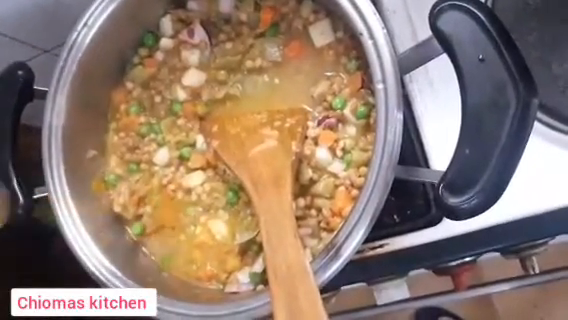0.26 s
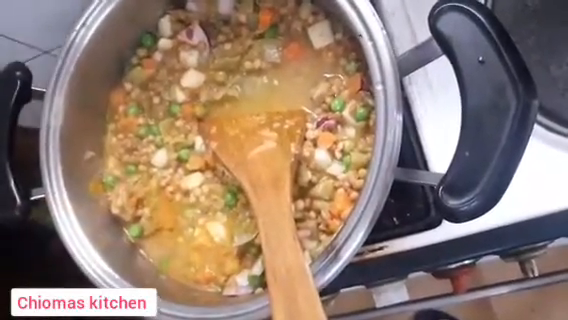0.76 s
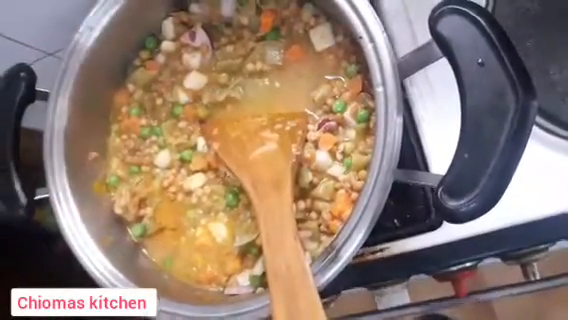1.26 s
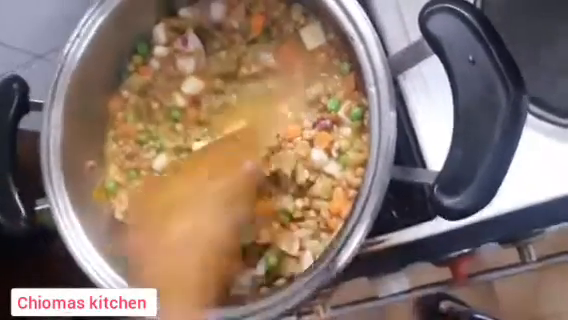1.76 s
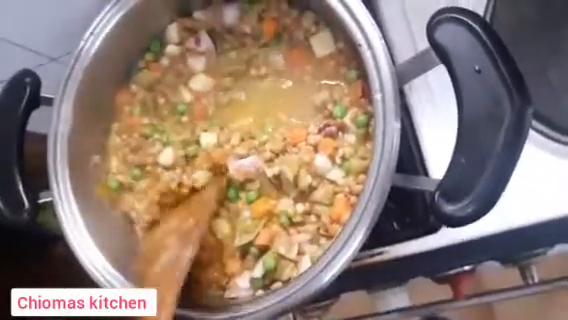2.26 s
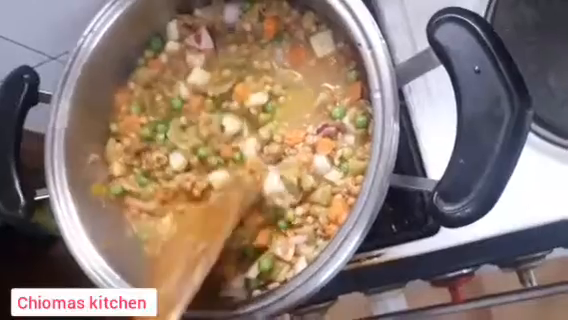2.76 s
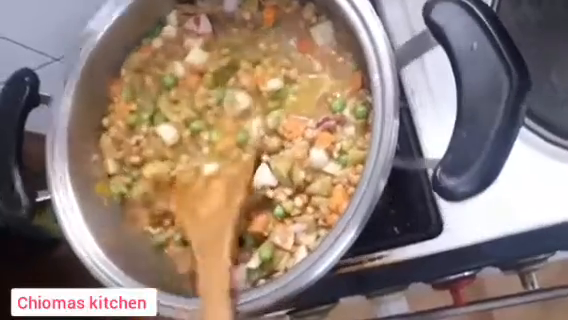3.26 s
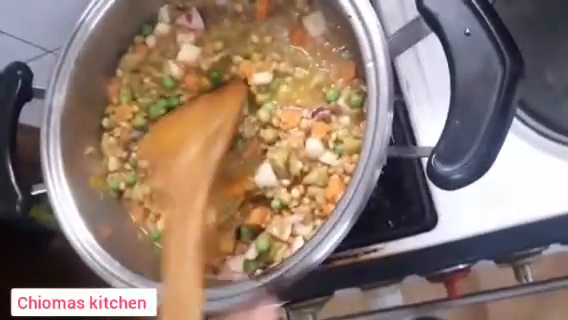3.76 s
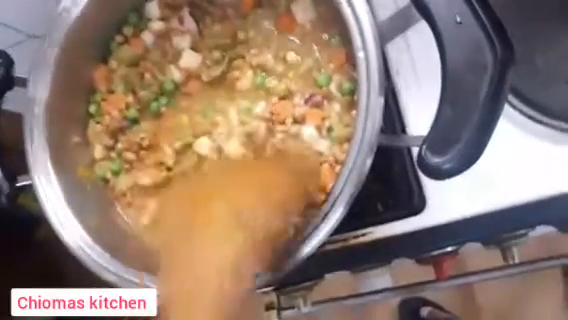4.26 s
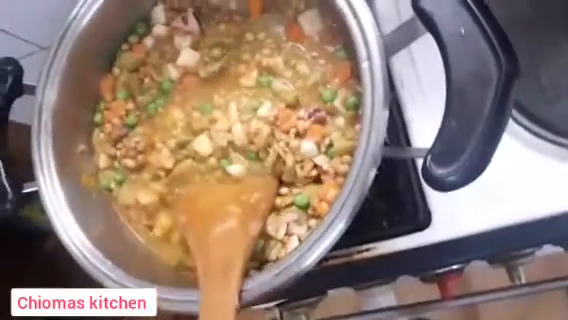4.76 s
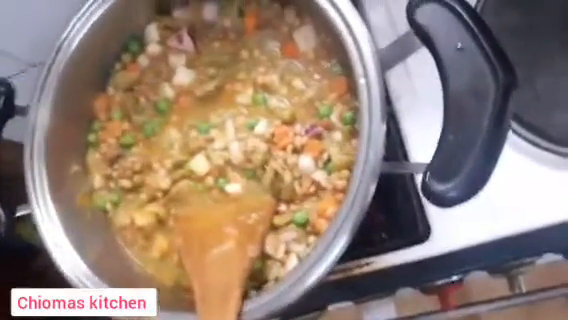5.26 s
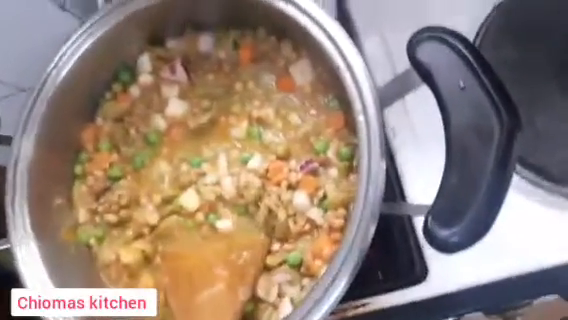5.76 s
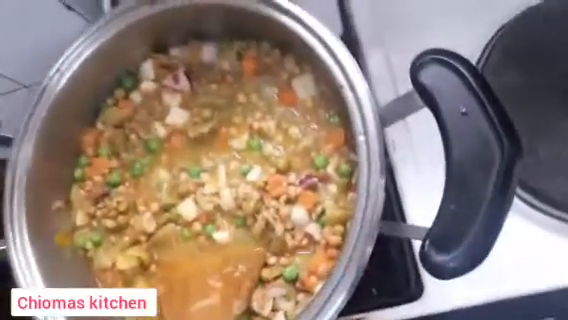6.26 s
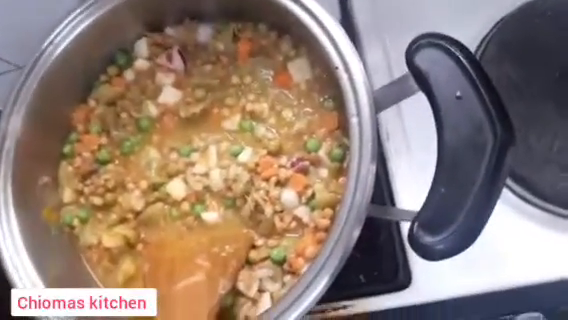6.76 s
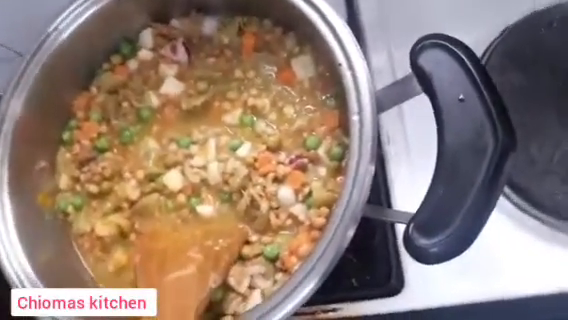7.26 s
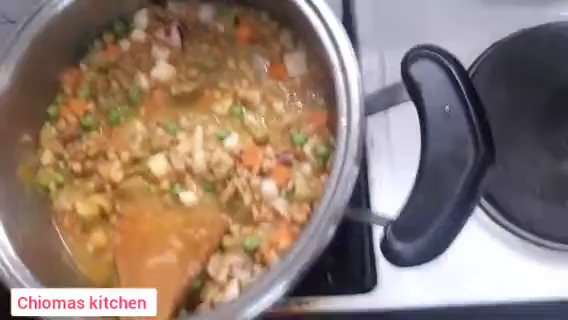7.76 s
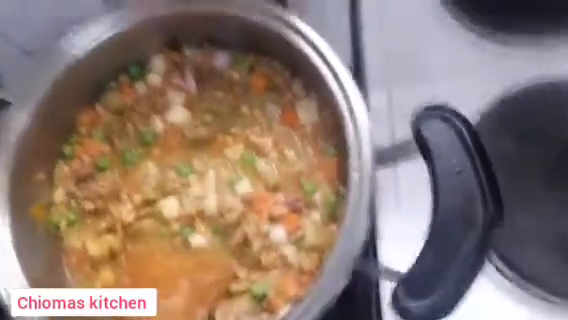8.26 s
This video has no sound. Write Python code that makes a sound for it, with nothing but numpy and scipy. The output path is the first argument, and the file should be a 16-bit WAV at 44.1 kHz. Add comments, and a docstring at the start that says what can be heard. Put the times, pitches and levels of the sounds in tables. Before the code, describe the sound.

A close mono phone microphone in a reflective home kitchen picks up low appliance drone, soft hiss and a faint high whine throughout. The first second is nearly just this bed with a weak rub. At 0.9 s a brief thin sagging tone and several taps sound until 1.4 s, with a bright wet swish and tiny ticks. At 2.1 s a loud sharp wooden spoon knock hits the damped steel pot, with softer bumps to 2.4 s. Knocks resume at 3.0 s, clustering around 3.2-3.4, 3.8-3.9, 4.1-4.6 and 4.7-5.0 s, mixed with scraping, wet slop and low stove thumps. Soft rubs follow. At 5.87 s a hard object drops loudly across the room, clattering for a third of a second with reverberation. A short squeaky rub comes at 6.55-6.7 s, then sparse taps to 7.4 s and gentle dragging. A lower whine grows towards 8.2 s; a firm double tap and scrape come at 8.3 s before the end at about 8.5 s.

```python
"""Close under a mono phone microphone, a wooden spoon works in a steel pot of thick porridge.
Appliance drone, hiss and a faint whine run throughout, under the rub and wet slop of stick-slip dragging.
A thin tone and taps on other things come first, with wet ticks; from 2.1 to 5 s the spoon knocks the pot,
sounding contact notes, a crack, a thud in the food, the damped pot and the stove. More taps follow; at 5.9 s
a hard object drops and clatters in the hard-walled kitchen, then comes a squeaky rub, and a lower whine grows."""
import sys
import numpy as np
from scipy import signal
from scipy.fft import rfft, irfft
from scipy.io import wavfile
from scipy.ndimage import uniform_filter1d

SR = 44100
rng = np.random.default_rng(int(sys.argv[2]) if len(sys.argv) > 2 else 0)


def materialize(psi):
    """Save the field psi as 16-bit PCM at rate SR to the path in sys.argv[1].

    A 1-D psi becomes a single channel; in a 2-D psi each row is a channel.
    """
    bounded = np.clip(np.atleast_2d(psi).T, -1, 1)
    quanta = np.round(bounded * 32767).astype(np.int16)
    wavfile.write(sys.argv[1], SR, quanta)


N = 375732
T = np.arange(N) / SR


def undb(db):
    """Decibels to amplitude."""
    return 10 ** (np.asarray(db) / 20)


def unit(x):
    """Scale to rms 1."""
    return x / np.sqrt(np.mean(x ** 2))


def along(table, hz):
    """Value of (Hz, value) points on a log-frequency axis."""
    f, v = np.transpose(table)
    return np.interp(np.log(hz + 1), np.log(f), v)


def colour(x, table):
    """Causal minimum-phase filter with a (Hz, dB) spectrum; white noise of rms 1 keeps about rms 1."""
    gain = undb(along(table, np.fft.rfftfreq(len(x), 1 / SR)))
    cepstrum = irfft(np.log(gain / np.sqrt(np.mean(gain ** 2))), len(x))
    # fold the cepstrum forward in time, so nothing sounds before its cause
    cepstrum[1:len(x) // 2] *= 2
    cepstrum[len(x) // 2 + 1:] = 0
    return irfft(rfft(x) * np.exp(rfft(cepstrum)), len(x))


def ring(t, hz, t60):
    """A sine that falls 60 dB in t60 seconds."""
    return np.sin(2 * np.pi * hz * t) * np.exp(-np.log(1000) * t / t60)


def modes(t, table, spread_db):
    """A struck object; each blow lands elsewhere and weights and tunes the modes anew."""
    hz, db, t60 = np.transpose(table)[:, :, None]
    chance = rng.standard_normal((2, len(table), 1))
    level = undb(db + spread_db * chance[0])
    pitch_hz = hz * (1 + 0.011 * chance[1])
    return (level * ring(t, pitch_hz, t60)).sum(axis=0)


def walk(rate):
    """Random levels held 1 / rate s and slewed twice; rms 1."""
    k = int(SR / rate)
    steps = np.repeat(rng.standard_normal(N // k + 1), k)
    return unit(uniform_filter1d(uniform_filter1d(steps, k), k)[:N])


def add(bus, s, x):
    """Mix x into the bus from s seconds on."""
    i = int(s * SR)
    bus[i:i + len(x)] += x[:N - i]


# Drone and hiss spectrum: pitch_hz [Hz], density_db [relative dB per Hz]
DRONE_SPECTRUM = [(15, -42), (25, -11), (144, -8.5), (216, -6), (254, -13.5), (315, -13.5), (485, -14),
                  (526, -12.5), (1250, -15.5), (1350, -14), (1590, -41), (4420, -77), (6630, -38.5),
                  (8450, -51.5), (15700, -32)]
DRONE_DB = -57.5  # rms, around which it swells


def drone():
    """Appliance drone and hiss: coloured noise that swells slightly."""
    return undb(DRONE_DB + 1.0 * walk(2.76)) * unit(colour(rng.standard_normal(N), DRONE_SPECTRUM))


# Centre pitches of the two whines: upper, lower [Hz]
WHINE_HZ = (1234, 1187)
UPPER_WHINE_DB = -69  # rms
# Swell of the lower whine: time_s [s], level_db [dB rms]
LOWER_WHINE = [(7.3, -74), (7.6, -66), (7.95, -63), (8.2, -57), (8.52, -59.5)]


def whines():
    """Two thin sines wavering in pitch and level; the lower one grows late."""
    out = np.zeros(N)
    lower_db = np.interp(T, *np.transpose(LOWER_WHINE))
    for hz, db in zip(WHINE_HZ, (UPPER_WHINE_DB, lower_db)):
        phase = 2 * np.pi * np.cumsum(hz + 1.5 * walk(15)) / SR
        out += np.sqrt(2) * undb(db + 1.5 * walk(12)) * np.sin(phase)
    return out


# Steel pot modes, damped by the food: pitch_hz [Hz], level_db [dB], t60_s [s]
POT_MODES = [(520, -2, .05), (640, 0, .05), (760, 0, .05), (1000, 0, .04), (1150, 0, .04), (1400, 0, .04),
             (1560, 0, .04), (1700, 0, .04), (1890, -2, .04), (2200, -4, .03), (2450, -5, .03),
             (2690, -7, .03), (3250, -10, .03)]
# Low modes of the pot bottom: pitch_hz [Hz], level_db [dB], t60_s [s]
THUD_MODES = [(231.5, -8.5, 0.11), (329.4, -5.5, 0.14), (400.5, 0, 0.049)]
# Wet food spectrum: pitch_hz [Hz], density_db [relative dB per Hz]
SLOP_SPECTRUM = [(880, -17), (1500, 2), (1690, 4), (2750, -0.5), (3510, -1.5), (4610, -9), (6430, 0.5),
                 (8050, -18.5), (10100, -14), (15500, -18)]
# Scrapes and swishes: full_level_s [s], hold_s [s], low_rub_db [dB rms], bright_slop_db [dB rms]
SCRAPES = [(.4, .55, -66, -65.5), (1.164, 0.0041, -59, -42.5), (1.285, 1.8, -64.5, -59.5),
           (2.15, 0.11, -48.5, -57), (3.326, .1, -60, -54), (3.5, .25, -58, -61), (3.803, 0.04, -53, -53.5),
           (3.907, 0.0088, -44, -59), (4.183, .01, -42.5, -55), (4.233, 0.0069, -47, -42),
           (4.442, 0.11, -48.5, -70), (4.58, .02, -59, -56.5), (4.95, 0.043, -54.5, -69),
           (5.35, .03, -52.5, -53), (5.541, .03, -47, -62), (5.752, .01, -56, -57.5),
           (6.235, .03, -58, -56), (6.55, .27, -57, -58.5), (6.827, 0.37, -57.5, -55.5),
           (7.446, 0.073, -67, -56), (7.705, 0.69, -61.5, -61), (8.335, .01, -45, -43.5),
           (8.44, .08, -56, -55)]
RISE_DB_PER_S, FALL_DB_PER_S = 251, 146
FLOOR_RUB_DB, FLOOR_SLOP_DB = -61, -63  # rms between scrapes


def drag():
    """Stick-slip ticks shake the pot; wet food hisses and slops; both swell and fade with each scrape."""
    s, hold, rub_db, slop_db = np.transpose(SCRAPES)[:, :, None]
    before_db = RISE_DB_PER_S * np.clip(s - T, 0, None)
    after_db = FALL_DB_PER_S * np.clip(T - s - hold, 0, None)
    away_db = before_db + after_db
    rub_level = undb(np.maximum((rub_db - away_db).max(axis=0), FLOOR_RUB_DB))
    slop_level = undb(np.maximum((slop_db - away_db).max(axis=0), FLOOR_SLOP_DB))

    t = T[:SR // 8]
    slips = (rng.random(N) < .05) * rng.standard_normal(N) * undb(2.0 * walk(30))
    body = modes(t, POT_MODES, 0) + undb(1.5) * modes(t, THUD_MODES, 0)
    rub = signal.fftconvolve(slips, body)[:N]
    slop = colour(rng.standard_normal(N) * undb(2.2 * walk(60)), SLOP_SPECTRUM)
    return rub_level * unit(rub) + slop_level * unit(slop)


TONE_S, TONE_LENGTH_S, TONE_HZ, TONE_SAG_HZ_PER_S, TONE_DB = .92, 0.18, 720, 150, -52


def thin_tone():
    """One brief sine that sags in pitch under a rounded envelope."""
    out, t = np.zeros(N), T[:int(TONE_LENGTH_S * SR)]
    phase = 2 * np.pi * (TONE_HZ - TONE_SAG_HZ_PER_S * t / 2) * t
    add(out, TONE_S, undb(TONE_DB) * np.sin(phase) * np.sin(np.pi * t / TONE_LENGTH_S))
    return out


# Contact crack spectrum: pitch_hz [Hz], density_db [relative dB per Hz]
CRACK_SPECTRUM = [(880, -15.5), (1500, -9.5), (2370, -11.5), (3000, -17), (3720, -14.5), (4530, -18),
                  (5560, -11.5), (10700, -39.5), (15500, -46)]
# Wooden spoon modes: pitch_hz [Hz], level_db [dB], t60_s [s]
SPOON_MODES = [(840, -2, .07), (1300, -2, .08), (2030, 0, .1), (2870, -3, .09), (3830, -5, .11),
               (4040, -5, .11)]
REACH_DB_PER_OCTAVE = 9  # how fast the skid weakens away from a contact note


def strike(row, clack_db=None):
    """One blow: two contact notes, crack, thud, a fading skid and, if clack_db is given, a spoon clack."""
    level_db, low_hz, high_hz, low_db, high_db, thud_db, crack_db, skid_db, t60 = row
    t = T[:SR // 2]
    fade = np.exp(-np.log(1000) * t / t60)

    crack = unit(colour(rng.standard_normal(len(t)), CRACK_SPECTRUM))
    crack = crack * (np.exp(-t / 0.0033) + 0.15 * fade) * (1 - np.exp(-t / 0.0016))
    blow = undb(low_db) * ring(t, low_hz, 0.044) + undb(high_db) * ring(t, high_hz, 0.035)
    blow = blow + undb(crack_db) * crack + undb(thud_db) * modes(t, THUD_MODES, 4.4)
    if clack_db is not None:
        blow = blow + undb(crack_db + clack_db) * modes(t, SPOON_MODES, 1.5)

    # fading slips after contact shake the steel, most near the contact notes
    reach = []
    for hz, db, ring_s in POT_MODES:
        near_low_db = low_db - REACH_DB_PER_OCTAVE * abs(np.log2(hz / low_hz))
        near_high_db = high_db - REACH_DB_PER_OCTAVE * abs(np.log2(hz / high_hz))
        reach.append((hz, db + max(near_low_db, near_high_db), ring_s))
    slips = (rng.random(len(t)) < .08) * rng.standard_normal(len(t))
    body = modes(t[:SR // 10], reach, 3.2)
    skid = unit(signal.fftconvolve(slips, body)[:len(t)]) * fade

    onset = 1 - np.exp(-t / 0.0004)
    # the blows carry no deep bass
    small = signal.butter(2, 160, "highpass", fs=SR, output="sos")
    return undb(level_db) * signal.sosfilt(small, (blow + undb(skid_db) * skid) * onset)


# Taps on other things: start_s [s], level_db [dB], low_note_hz [Hz], high_note_hz [Hz],
# then low_note_db, high_note_db, thud_db, crack_db, skid_db [dB re level_db],
# skid_t60_s [s], room_db [dB re blow; far = more]
TAPS = [(.99, -27, 730, 1367, -3, 1.5, -35, -10, -15.5, 0.21, -8.5),
        (1.123, -31.5, 1140, 1770, -14, -13, -10, 3, -9.5, 0.16, -2.5),
        (1.147, -21.5, 794, 2380, -7.5, -30, -12.5, -1, -12.5, 0.11, -14.5),
        (1.301, -39, 615, 2320, -17, -10, -16, -2, -10, 0.2, 0),
        (1.385, -27, 730, 1970, -3, -6.5, -4.5, -3, -10, .14, -10),
        (5.528, -37.5, 1000, 1320, -2, -8.5, -6, -28, -12, 0.2, 4.5),
        (6.355, -46, 900, 1940, -21, -10, -14, 3, -29, .13, -2),
        (6.453, -52, 860, 1240, -1, -14, -18, 5, -21, .2, -11),
        (6.522, -36, 584, 2265, -17.5, -8, -32, -21, -13.5, 0.32, 4.5),
        (6.845, -31, 1170, 1426, -9, -5, -41, -11, -21, 0.23, 2.5),
        (7.029, -39, 794, 2420, -27, -2.5, -23, -8, -16, 0.16, -2),
        (7.399, -38, 810, 2000, -15, -5, -11, -10, -13.5, 0.2, -0.5),
        (8.27, -18.5, 1097, 1136, -15, -8.5, -23, -34, -11.5, 0.12, -11.5),
        (8.288, -24.5, 1060, 1935, -20, -6, -6, -11, -17.5, 0.35, -1.5)]


def taps():
    """Other things are struck without the spoon's clack; returns direct sound and room send."""
    near, send = np.zeros(N), np.zeros(N)
    for s, *row, room_db in TAPS:
        blow = strike(row)
        add(near, s, blow)
        add(send, s, undb(room_db) * blow)
    return near, send


# Reverberation of the hard-walled kitchen: pitch_hz [Hz], t60_s [s]
ROOM_T60 = [(100, 0.7), (500, 0.56), (2000, 0.36), (6000, 0.41), (14000, 0.48)]


def room(x):
    """Diffuse noise tail, decaying octave by octave after a short build-up."""
    t = T[:SR]
    spec, f = rfft(rng.standard_normal(SR)), np.fft.rfftfreq(SR, 1 / SR)
    tail = 0
    for hz in 62.5 * 2. ** np.arange(9):
        octave = np.clip(1 - abs(np.log2((f + 1) / hz)), 0, 1)
        tail = tail + irfft(spec * octave, SR) * np.exp(-np.log(1000) * t / along(ROOM_T60, hz))
    tail = tail * (1 - np.exp(-t / 0.0014))
    return signal.fftconvolve(x, tail / np.sqrt(np.sum(tail ** 2)))[:N]


# Faint wet ticks: start_s [s], level_db [dB rms before decay], pitch_hz [Hz]
TICKS = [(1.367, -44, 5000), (1.454, -46, 2620), (2.561, -48, 2600), (2.705, -54, 4000),
         (2.722, -56, 10000), (2.755, -57, 6430), (2.91, -53, 6000), (2.992, -52, 4200), (3.599, -53, 6300),
         (3.707, -52, 6350), (8.21, -57, 6300)]
TICK_DECAY_MS = 3.6


def ticks():
    """Tiny pops of the food: a click of noise around one pitch."""
    out, t = np.zeros(N), T[:SR // 20]
    for s, db, hz in TICKS:
        band = signal.butter(2, (hz / 1.2, hz * 1.2), "bandpass", fs=SR, output="sos")
        noise = unit(signal.sosfilt(band, rng.standard_normal(len(t))))
        add(out, s, undb(db) * noise * np.exp(-t * 1000 / TICK_DECAY_MS))
    return out


# Spoon on pot: start_s [s], level_db [dB], low_note_hz [Hz], high_note_hz [Hz],
# then low_note_db, high_note_db, thud_db, crack_db, skid_db [dB re level_db],
# skid_t60_s [s], stove_rumble_db [dB peak]
KNOCKS = [(2.1, -8.5, 835, 1600, -11, 1, -26, -20, -16, 0.13, -52),
          (2.209, -31.5, 585, 1260, -3, -5, -7.5, -19, -5, 0.23, -59),
          (2.276, -33.5, 580, 1310, 2, -2, -7, -25, -6.5, 0.24, -65),
          (2.409, -26.5, 714, 1440, -4.5, -16, 0, -33, -11, 0.17, -46),
          (3.012, -29.5, 630, 1230, -5, -11.5, 1, -25, -9, 0.11, -45),
          (3.188, -14.5, 892, 1340, -3.5, -5, -10.5, -5, -16.5, 0.19, -40.5),
          (3.224, -26, 870, 1210, -18, 0, -7.5, -5.5, -15, .21, -54),
          (3.287, -22, 990, 1270, -14, -4, -13.5, -13, -10, 0.086, -40),
          (3.355, -19, 838, 1998, -4.5, -1, -11.5, -4.5, -14, 0.16, -68),
          (3.41, -25.5, 810, 1300, -8, -2.5, -13, -10, -15, 0.27, -42),
          (3.833, -17, 1045, 1410, -1, -4.5, -9, -15, -7.5, 0.26, -62),
          (3.851, -19.5, 1054, 1465, -12, 4.5, -23, -17.5, -8.5, 0.27, -62),
          (3.912, -26.5, 804, 1620, -3, -7, -4, -11, -20, .14, -45),
          (4.12, -20, 747, 2400, -6.5, -2.5, -2, -2, -12.5, 0.21, -30),
          (4.214, -29, 1060, 1720, -6.5, -8, -5, -3, -14.5, 0.27, -43),
          (4.357, -25.5, 810, 1645, -11, -4, -18, -11.5, -11.5, 0.13, -52),
          (4.484, -33, 1030, 1460, 2, -16, -7.5, -36, -8.5, 0.37, -59),
          (4.601, -17, 1060, 1280, -5, -11, -8.5, -28, -8, 0.093, -41.5),
          (4.732, -19, 812, 2050, -2, -10, -7.5, 1, -15, 0.19, -38),
          (4.777, -18.5, 885, 1890, -26, -2, -19, -12, -20, 0.19, -41),
          (4.821, -22, 720, 2500, -2.5, 0.5, 1.5, 8.5, -8.5, .25, -28.5),
          (4.996, -38, 710, 1950, -10, -6, -27, -20, -16, .16, -41.5)]
CLACK_DB, KNOCK_ROOM_DB = -9.5, -11  # spoon clack re crack; room send re blow


def knocks():
    """The spoon strikes the pot and the stove top answers late and low; returns direct sound and room send."""
    near, send, t = np.zeros(N), np.zeros(N), T[:SR // 2]
    stove = signal.butter(2, (85, 190), "bandpass", fs=SR, output="sos")
    shape = np.exp(-t / 0.076) * (1 - np.exp(-t / 0.0047))
    for s, *row, rumble_db in KNOCKS:
        blow = strike(row, CLACK_DB)
        rumble = signal.sosfilt(stove, rng.standard_normal(len(t)) * shape)
        add(near, s, blow + undb(rumble_db) * rumble / np.abs(rumble).max())
        add(send, s, undb(KNOCK_ROOM_DB) * blow)
    return near, send


# Dropped object's burst spectrum: pitch_hz [Hz], density_db [relative dB per Hz]
BANG_SPECTRUM = [(60, -63), (140, -31), (400, -9.5), (500, -13), (709, -4), (870, -7), (1250, 1.5),
                 (1650, 2), (2040, 9), (2700, -10.5), (3750, -2.5), (4700, -17), (6560, -12.5), (8180, -38),
                 (15500, -46)]
BANG_S, BANG_DB, BANG_DECAY_MS = 5.868, -5, 4.5


def bang():
    """A hard object dropped across the kitchen lands with a short coloured noise burst."""
    out, t = np.zeros(N), T[:SR // 2]
    impact = rng.standard_normal(len(t)) * np.exp(-t * 1000 / BANG_DECAY_MS)
    add(out, BANG_S, undb(BANG_DB) * colour(impact, BANG_SPECTRUM))
    return out


# Clatter spectrum: pitch_hz [Hz], density_db [relative dB per Hz]
CLATTER_SPECTRUM = [(47, -71.5), (80, -33), (158, -7.5), (252, -18.5), (400, -13), (466, -17), (594, -4),
                    (809, -22.5), (2130, -1.5), (2540, -13), (6420, -9), (8180, -23), (11000, -22),
                    (15500, -32)]
CLATTER_DB, CLATTER_S = -20.5, 0.33  # level before the fade; length


def clatter():
    """The dropped object clatters: grainy noise with random flutter that dies out."""
    out, t = np.zeros(N), T[:SR // 2]
    grains = rng.standard_normal(len(t)) * undb(2.6 * walk(93)[:len(t)])
    fade = np.exp(-t / 0.24) * np.clip(1 - t / CLATTER_S, 0, 1) * (1 - np.exp(-t / 0.019))
    add(out, BANG_S, undb(CLATTER_DB) * colour(unit(grains) * fade, CLATTER_SPECTRUM))
    return out


# Level of a squeaky rub: time_s [s], level_db [dB rms]
SQUEAK_LEVEL = [(6.51, -87), (6.525, -68), (6.539, -44), (6.555, -53.5), (6.61, -42.5), (6.65, -48),
                (6.74, -62)]
# Its resonances: pitch_hz [Hz], half_width_hz [Hz], peak_db [relative dB]
SQUEAK_PEAKS = [(1120, 66, -2.5), (2310, 38, 5), (3470, 160, -8), (3850, 22, -1), (4800, 68, -7),
                (5440, 15, -25), (6940, 13, -6)]


def squeak():
    """Fast slips ring a few narrow resonances."""
    s, db = np.transpose(SQUEAK_LEVEL)
    level = undb(np.interp(T, s, db, left=-120, right=-120))
    slips = (rng.random(N) < .04) * rng.standard_normal(N)
    t = T[:SR // 10]
    # a narrower peak rings longer; the factor width evens out their heights
    body = sum(undb(peak_db) * ring(t, hz, 1.1 / width) * width for hz, width, peak_db in SQUEAK_PEAKS)
    return level * unit(signal.fftconvolve(slips, body)[:N])


def scene():
    """Direct sounds plus the room's answer, the same in both channels."""
    tap_near, tap_send = taps()
    knock_near, knock_send = knocks()
    burst, rattle = bang(), clatter()
    # the burst is heard mostly as room
    send = tap_send + knock_send + undb(7) * burst + undb(-6.5) * rattle
    background = drone() + whines()
    near = drag() + thin_tone() + tap_near + ticks() + knock_near + burst + rattle + squeak()
    mono = background + near + room(send)
    return np.array([mono, mono])


TOP_HZ = 15800


def record(dry):
    """The phone thins the deep bass, rounds the loudest peaks and cuts the top."""
    thin = signal.sosfilt(signal.butter(3, 55, "highpass", fs=SR, output="sos"), dry)
    rounded = 1.5 * np.tanh(thin / 1.5)
    return signal.sosfilt(signal.ellip(10, .2, 70, TOP_HZ, fs=SR, output="sos"), rounded)


dry = scene()
out = record(dry)
materialize(out)
```